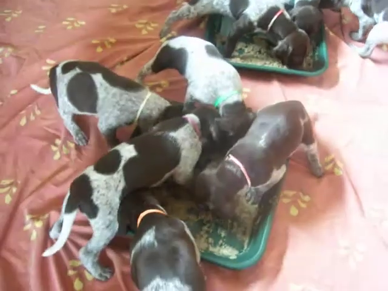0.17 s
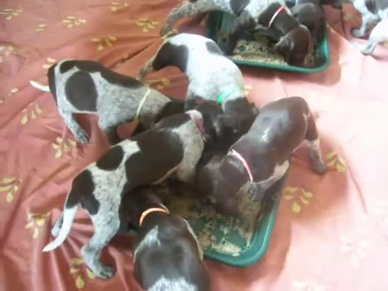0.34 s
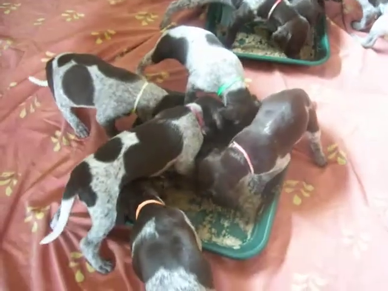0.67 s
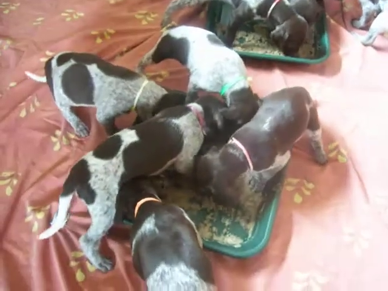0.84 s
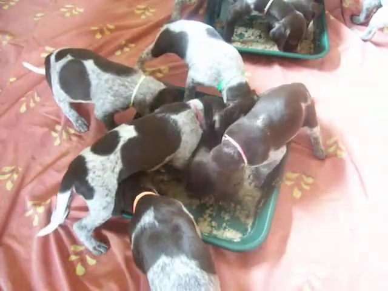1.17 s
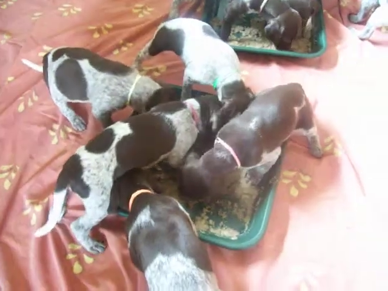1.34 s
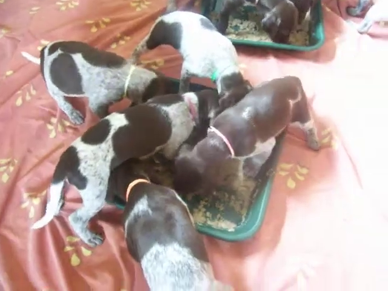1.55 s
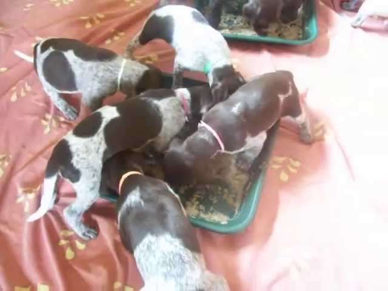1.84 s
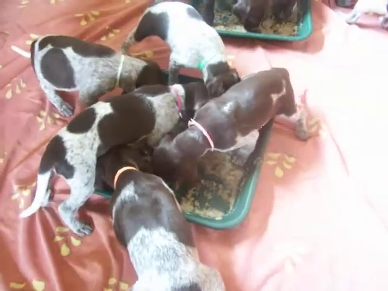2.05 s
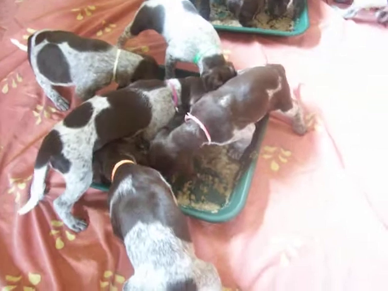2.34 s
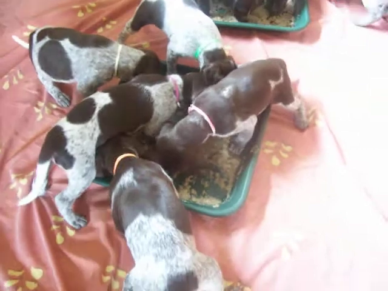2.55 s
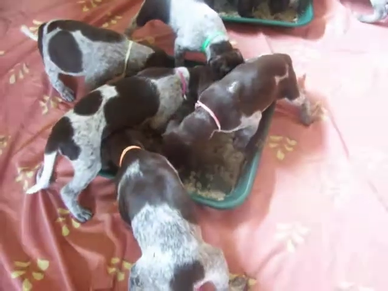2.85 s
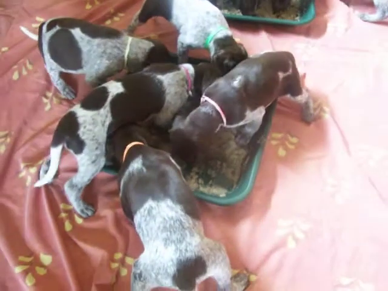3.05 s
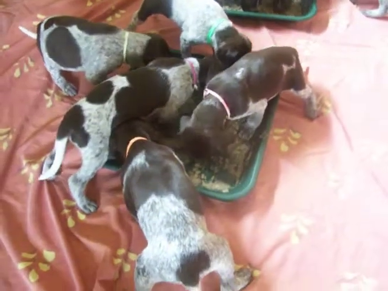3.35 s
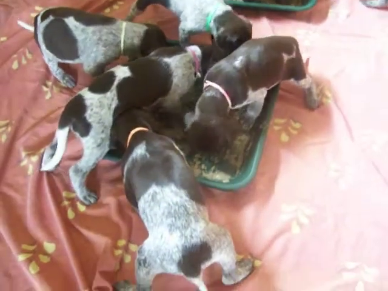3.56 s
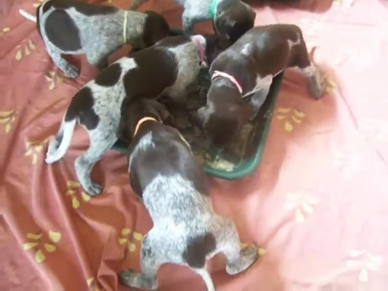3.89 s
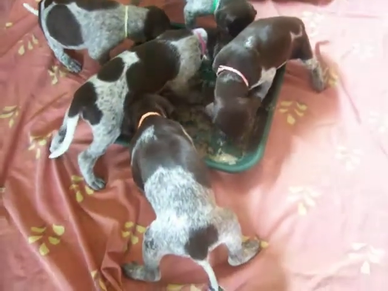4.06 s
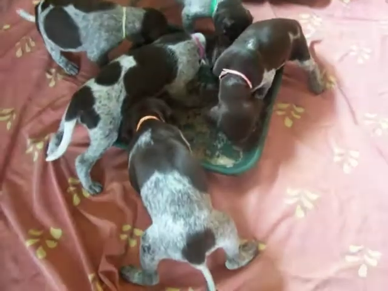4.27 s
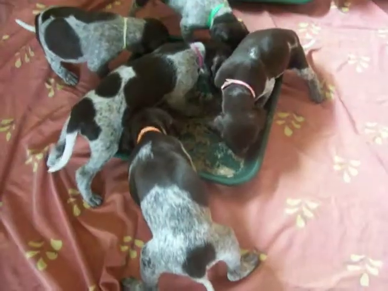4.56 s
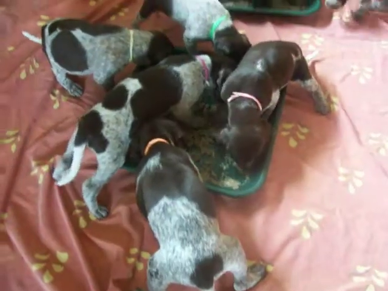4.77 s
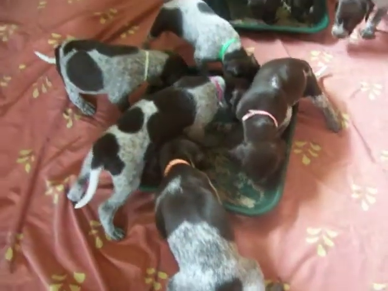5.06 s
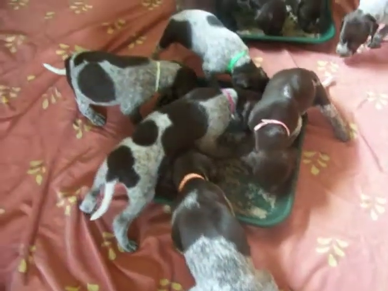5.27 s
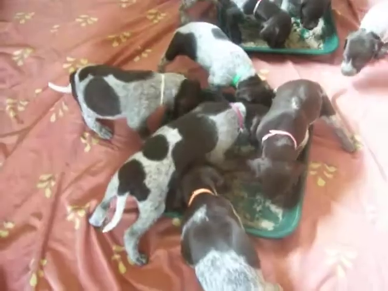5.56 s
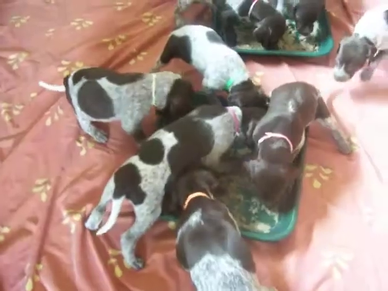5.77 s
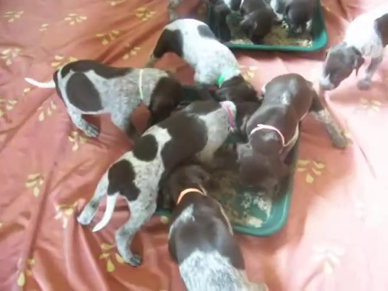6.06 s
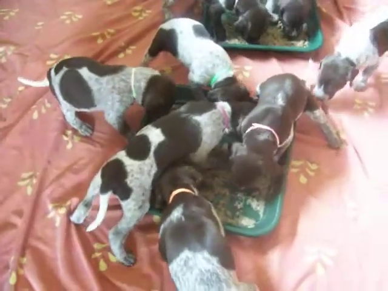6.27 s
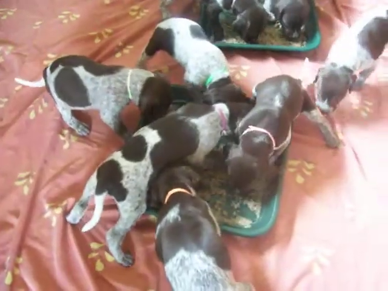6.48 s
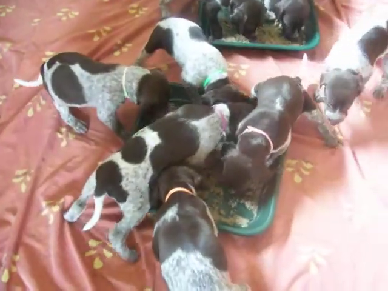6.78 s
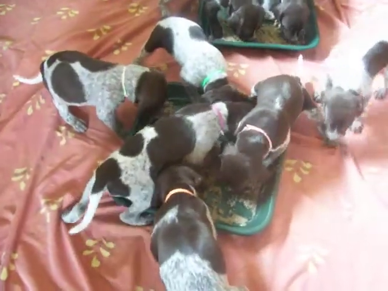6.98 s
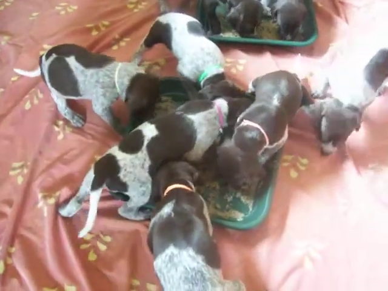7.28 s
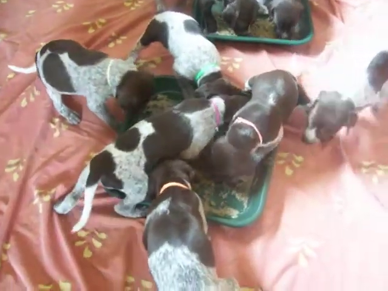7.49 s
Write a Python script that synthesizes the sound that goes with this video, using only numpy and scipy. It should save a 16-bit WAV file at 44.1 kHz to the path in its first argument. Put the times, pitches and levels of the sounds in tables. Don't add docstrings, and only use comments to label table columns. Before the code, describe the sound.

A litter of puppies eats wet food from shallow plastic trays in a small room. Irregular lip smacks, sharp tooth ticks and crackling slurps overlap continuously in short bouts, with hollow little glugs. Brief soft whimpers and gliding yelps appear mostly between two and five seconds. The mouths are close and fairly dry; the voices carry a short room echo. Faint hiss, low rumble and a distant motor lie beneath, through a modest camera microphone.

```python
import sys
import numpy as np
from scipy import signal
from scipy.fft import rfft, irfft
from scipy.io import wavfile
from scipy.ndimage import uniform_filter1d

SR = 44100
rng = np.random.default_rng(int(sys.argv[2]) if len(sys.argv) > 2 else 0)


def volts_from_db(level):
    exponent = np.asarray(level, float) / 20
    return 10 ** exponent


def transcribe(u):
    v = np.clip(np.atleast_2d(u).T, -1, 1)
    q = np.round(v * 32767).astype(np.int16)
    wavfile.write(sys.argv[1], SR, q)


N = 336924


def rms_one(x):
    return x / np.sqrt(np.mean(x ** 2) + 1e-20)


def in_time(rows):
    s, *columns = np.transpose(rows)
    times = np.arange(N) / SR
    return [np.interp(times, s, column) for column in columns]


def band(x, low_hz, high_hz, order=2):
    sos = signal.butter(order, [low_hz, high_hz], "band", fs=SR, output="sos")
    return signal.sosfilt(sos, x)


def drift(rate_hz):
    hop = 40
    r = np.exp(-2 * np.pi * rate_hz * hop / SR)
    noise = rng.standard_normal(N // hop + 2002)
    slow = signal.lfilter([1], [1, -2 * r, r * r], noise)[2000:]
    return np.interp(np.arange(N) / hop, np.arange(len(slow)), rms_one(slow))


def ring(clicks, hz, t60):
    r = volts_from_db(-60 / (t60 * SR))
    w = 2 * np.pi * hz / SR
    return signal.lfilter([0, np.sin(w)], [1, -2 * r * np.cos(w), r * r], clicks + 1e-18)


def smacks():
    rows = all_smacks()
    t = np.arange(2048) / SR
    out = np.zeros(N + len(t))
    wide = signal.butter(2, [1900, 7900], "band", fs=SR, output="sos")
    noises = rng.standard_normal((len(rows), len(t)))
    for (s, peak_db, hz, t60, breadth), noise in zip(rows, noises):
        spatter = 0.46 * noise * np.abs(np.roll(noise, 99)) * volts_from_db(-60 * t / max(t60, 0.002))
        spatter[0] = 1.51

        share = np.clip(breadth, 0.2, 1)
        reach = 1.25 + 1.8 * share ** 2
        crack = band(spatter, max(hz / reach, 1600), min(hz * reach, 9000), order=3)
        cavity = band(ring(crack, hz, 9 / hz), hz / 1.2, hz * 1.2, order=1)
        snap = signal.sosfilt(wide, spatter)
        pop = share * rms_one(crack) + (1 - share) * rms_one(cavity) + volts_from_db(-7) * rms_one(snap)

        at = round((s + 0.0007) * SR)
        out[at:at + len(t)] += volts_from_db(peak_db + 1.5) * pop / np.abs(pop).max()
    return out[:N]


def all_smacks():
    # t/s, peak level/dB, mouth cavity f/Hz, t60/s, crack breadth
    bodies = [
        (0.5025, -15, 4960, 0.0089, 0.7),
        (1.3726, -37, 2400, 0.0099, 0.1),
        (3.0381, -23.5, 3620, 0.015, 0.7),
        (3.6269, -18.5, 4500, 0.0021, 0.5),
        (5.3568, -28, 3450, 0.0073, 0),
        (6.7166, -15.5, 4270, 0.0056, 0.6),
    ]
    # t/s, peak level/dB, mouth cavity f/Hz, t60/s
    deep_smacks = [(0.389, -31, 2340, 0.048), (0.4329, -31.5, 3200, 0.012), (0.4666, -27.5, 2340, 0.029),
                   (0.7939, -28.5, 2910, 0.06), (1.7018, -37, 2110, 0.015), (1.7261, -52, 1810, 0.03),
                   (1.9605, -24.5, 3300, 0.023), (2.2913, -31.5, 2720, 0.021), (2.6978, -30, 2200, 0.0078),
                   (2.7308, -23, 3460, 0.036), (3.0379, -22, 3440, 0.016), (4.1285, -38, 1980, 0.0086),
                   (4.2065, -31, 2370, 0.013), (5.326, -37, 2080, 0.016), (5.3572, -21.5, 3050, 0.012),
                   (5.4804, -30, 2330, 0.061), (5.6423, -33.5, 2850, 0.013), (5.9504, -31, 2020, 0.018),
                   (5.9837, -36, 2030, 0.03), (6.181, -33, 2600, 0.02), (6.3974, -31, 2270, 0.031),
                   (6.766, -26.5, 2790, 0.014), (6.8115, -27, 3220, 0.017), (7.0928, -27, 2340, 0.0076)]
    # t/s, peak level/dB, mouth cavity f/Hz, t60/s
    lip_smacks = [(0.0472, -28, 3600, 0.019), (0.1437, -29.5, 4360, 0.008), (0.163, -26, 4180, 0.015),
                  (0.2526, -31.5, 5680, 0.011), (0.4098, -29, 4030, 0.015), (0.5592, -28.5, 4200, 0.014),
                  (0.9552, -32, 3500, 0.016), (1.3127, -23, 4500, 0.011), (1.6534, -32.5, 4130, 0.014),
                  (1.9126, -27, 4620, 0.0092), (2.0118, -30.5, 3460, 0.013), (2.0359, -33, 3500, 0.02),
                  (2.2627, -32, 5430, 0.012), (2.8734, -34.5, 3880, 0.025), (3.464, -34.5, 4130, 0.019),
                  (3.7815, -27, 4600, 0.013), (4.0655, -34, 3980, 0.015), (4.1487, -29, 4010, 0.0092),
                  (4.2767, -29.5, 3480, 0.011), (4.3031, -25, 4190, 0.014), (4.596, -25, 4530, 0.013),
                  (4.802, -28.5, 4300, 0.012), (4.9085, -32, 4250, 0.014), (4.956, -24.5, 3790, 0.014),
                  (6.6537, -26.5, 3850, 0.015), (7.2291, -22.5, 4430, 0.013), (7.3583, -31, 3500, 0.0074),
                  (7.417, -26.5, 4330, 0.019), (7.4726, -25, 4170, 0.0075), (7.6158, -30.5, 5550, 0.029),
                  (.470, -29, 4800, .03), (4.2065, -24, 5000, .015), (6.410, -30, 4000, .012),
                  (6.418, -30, 4400, .012), (6.531, -33, 3200, .02), (4.646, -29, 4000, .02),
                  (4.537, -31, 2800, .015), (4.345, -34, 3600, .012), (2.601, -34, 2600, .012),
                  (6.2265, -26, 4300, .015), (3.627, -27, 3700, .012), (4.235, -30, 6100, .02),
                  (4.428, -32, 6500, .015), (4.73, -34, 4300, .015), (2.795, -34, 2000, .02),
                  (3.297, -36, 2100, .02)]
    # t/s, peak level/dB, mouth cavity f/Hz, t60/s
    tooth_ticks = [(0.4873, -23.5, 6000, 0.012), (0.5038, -14.5, 7000, 0.0044), (0.6185, -31, 6600, 0.015),
                   (0.7846, -27, 7170, 0.025), (1.063, -32, 6170, 0.012), (1.0944, -29.5, 7400, 0.012),
                   (1.3553, -17.5, 7440, 0.0087), (1.493, -33, 6620, 0.015), (1.5574, -27, 7100, 0.023),
                   (1.6786, -28.5, 6570, 0.016), (2.393, -29, 6720, 0.011), (2.6005, -27.5, 7560, 0.023),
                   (2.6898, -29.5, 6150, 0.023), (3.241, -27.5, 7330, 0.017), (3.3233, -29, 6830, 0.018),
                   (3.5703, -29, 7600, 0.027), (3.6267, -17, 6480, 0.015), (3.8896, -26.5, 7000, 0.0082),
                   (4.4857, -28.5, 6720, 0.01), (4.8349, -26.5, 7400, 0.025), (5.0449, -21.5, 6030, 0.015),
                   (5.3911, -30.5, 6120, 0.025), (5.7733, -31.5, 5900, 0.0088),
                   (5.9274, -27.5, 6000, 0.014), (6.2262, -17.5, 6070, 0.0063), (6.3155, -31, 7000, 0.012),
                   (6.7161, -17.5, 6350, 0.008), (7.1636, -25, 7530, 0.014), (7.3093, -30, 6300, 0.015),
                   (7.453, -22, 7300, 0.015)]
    # t/s, peak level/dB, mouth cavity f/Hz
    small_spits = [(0.186, -30, 2880), (0.2114, -32, 3830), (0.2992, -28.5, 6220), (0.4668, -32, 2230),
                   (0.5153, -24, 4020), (0.5784, -25.5, 3800), (0.6526, -32, 4040), (0.7382, -31, 6100),
                   (0.7692, -30, 5400), (0.8562, -31, 3810), (0.9758, -31.5, 3670), (1.082, -29.5, 6970),
                   (1.271, -29, 3380), (1.286, -30.5, 3430), (1.3247, -28.5, 4450), (1.3376, -22, 6750),
                   (1.7341, -31, 1780), (2.0564, -23.5, 7300), (2.335, -29, 5760), (2.437, -30, 2220),
                   (2.7172, -25.5, 3330), (2.8798, -22.5, 5560), (2.9444, -29.5, 4340), (3.1165, -33, 2850),
                   (3.188, -34.5, 1970), (3.2061, -27.5, 5770), (3.3423, -23.5, 6530),
                   (3.9599, -30.5, 5840), (4.0972, -34, 6200), (4.376, -29.5, 3620), (4.4088, -29.5, 6370),
                   (4.5354, -28.5, 6480), (4.6207, -33, 1520), (4.9337, -23.5, 7470), (4.9861, -30, 1940),
                   (5.314, -38.5, 1770), (5.6264, -34, 2840), (5.7323, -31.5, 1900), (6.136, -39, 3000),
                   (6.1505, -28.5, 4120), (6.2564, -27.5, 1960), (6.3212, -26, 6230), (6.384, -29.5, 4580),
                   (6.3994, -30, 2280), (6.4174, -33, 2250), (6.4632, -34, 1920), (6.5122, -36, 1960),
                   (6.531, -37, 1560), (6.625, -33, 4400), (6.785, -29.5, 4700), (6.8374, -30.5, 7000),
                   (6.938, -35, 6120), (6.9865, -31, 3960), (7.006, -31, 5660), (7.0107, -27, 5510),
                   (7.0519, -31, 2030), (7.1356, -31, 2070), (7.2155, -29, 4270), (7.519, -26, 3870)]

    rows = list(bodies)
    for kind, breadth in [(deep_smacks, 0.45), (lip_smacks, 0.35), (tooth_ticks, 0.2)]:
        for s, peak_db, hz, t60 in kind:
            rows.append((s, peak_db, hz, t60, breadth + 0.004 * (peak_db + 28)))
    spit_t60_s, spit_breadth, spit_trim_db = 0.012, 0.36, -5.5
    for s, peak_db, hz in small_spits:
        rows.append((s, peak_db + spit_trim_db, hz, spit_t60_s, spit_breadth))
    return rows


def slurping():
    crackle_db, slosh_db = bouts()
    crackle = bubbles(per_s=1100, low_hz=3400, high_hz=8200, cycles=16, spread_db=4.3, smooth=0.65)
    slosh = bubbles(per_s=350, low_hz=1000, high_hz=3200, cycles=12, spread_db=3.5, smooth=0.9)
    return volts_from_db(crackle_db - 2.5) * crackle + volts_from_db(slosh_db - 8) * slosh


def bouts():
    # t/s, drain/s, crackle level/dB, slosh level/dB
    laps = [(0.0, 0.95, -43.5, -45.5), (0.4, 0.08, -37.5, -45), (.505, 0.11, -35.5, -57),
            (.967, 0.078, -39.5, -59.5), (1.101, 0.068, -43.5, -42), (1.667, 0.24, -54, -54),
            (2.299, 0.1, -41.5, -45), (2.625, 0.53, -40, -43), (3.048, .17, -39.5, -45.5),
            (3.639, 0.28, -44.5, -64), (3.907, 0.035, -43, -39), (4.21, 0.19, -36, -41.5),
            (4.85, 0.28, -44, -40.5), (5.059, 0.25, -37.5, -41.5), (5.356, 0.16, -62.5, -71),
            (5.484, .09, -40.5, -41), (5.653, .12, -46, -39), (6.19, 0.13, -45.5, -42),
            (6.401, 0.075, -42, -42), (6.777, 0.057, -37.5, -40), (7.1, 0.11, -41.5, -43.5)]
    # peak t/s, swell/s, crackle level/dB, slosh level/dB
    sucks = [(0.771, 0.16, -41.5, -41.5), (1.335, 0.085, -33.5, -42.5), (1.575, 0.13, -52, -68),
             (1.733, 0.12, -38, -37), (2.039, 0.081, -36.5, -43), (2.4, 0.048, -42, -43),
             (2.898, 0.07, -45, -59), (3.22, 0.22, -53, -46.5), (3.34, 0.12, -40.5, -58),
             (4.134, 0.061, -41, -39), (4.539, 0.21, -38, -37.5), (4.671, 0.063, -40, -37),
             (5.313, 0.082, -56.5, -53), (5.781, 0.017, -36, -39.5), (5.995, 0.04, -39.5, -59),
             (6.255, 0.05, -40.5, -33), (6.34, 0.087, -44.5, -40.5), (1.225, .05, -49, -37),
             (6.5, 0.059, -48, -44.5), (6.699, 0.071, -55.5, -51), (7.004, 0.054, -42.5, -41),
             (7.463, 0.27, -41, -43)]
    lap_attack_s, range_db = 0.02, 13.5
    chewing_db = np.array([[-54.5], [-71.5]])

    rows = [(lap_attack_s, *lap) for lap in laps]
    rows += [(suck[1], *suck) for suck in sucks]
    t = np.arange(0, N + 64, 64) / SR
    power = volts_from_db(2 * chewing_db)
    for rise_s, s, fall_s, *peaks_db in rows:
        away = np.maximum((s - t) / rise_s, (t - s) / fall_s)
        power = power + volts_from_db(2 * (np.array(peaks_db)[:, None] - range_db * away))
    return [10 * np.log10(np.interp(np.arange(N) / SR, t, p)) for p in power]


def bubbles(per_s, low_hz, high_hz, cycles, spread_db, smooth):
    sizes = volts_from_db(spread_db * np.minimum(rng.exponential(1, N), 3.6)) * rng.choice([-1, 1], N)
    born = rng.random(N) < per_s * volts_from_db(5 * drift(25)) / SR
    pitches = np.geomspace(low_hz, high_hz, 14)
    dealt = rng.integers(0, len(pitches), N)
    rings = sum(ring(sizes * born * (dealt == k), hz, cycles / hz) for k, hz in enumerate(pitches))
    air = band(rng.standard_normal(N), low_hz, high_hz) * volts_from_db(3.4 * drift(14))
    return rms_one(rms_one(band(rings, low_hz, high_hz, order=1)) + smooth * rms_one(air))


def glugs():
    # t/s, peak level/dB, resonance f/Hz, t60/s
    hollow_glugs = [(.19, -46.5, 640, 0.43), (.23, -48, 407, 0.33), (.695, -43.5, 740, 0.064),
                    (1.284, -38, 2050, 0.5), (1.415, -42, 800, 0.061), (3.92, -44, 150, 0.08),
                    (2.78, -35, 707, 0.055), (3.715, -43, 2060, 0.033), (3.744, -42.5, 1350, 0.03),
                    (3.78, -37, 1840, 0.037), (3.84, -41, 2130, 0.47), (4.206, -30.5, 2250, 0.18),
                    (4.208, -38, 1460, 0.25), (4.243, -43.5, 610, .2), (4.288, -34, 2100, 0.046),
                    (4.66, -42, 720, 0.054), (5.052, -31, 3200, 0.14), (5.482, -38, 2200, 0.39),
                    (5.48, -38.5, 890, 0.026), (5.57, -45.5, 770, 0.16), (5.985, -34.5, 2010, 0.04),
                    (6.116, -43.5, 500, 0.018), (6.18, -36, 1150, 0.065), (6.179, -40.5, 873, 0.09),
                    (6.228, -43, 1070, 0.043), (6.315, -43.5, 1200, 0.053), (6.428, -43, 1040, 0.051),
                    (6.525, -39, 1710, 0.07), (1.728, -35.5, 1860, 0.064), (1.835, -47, 800, 0.25),
                    (1.59, -43.5, 2010, .08), (2.785, -39.5, 1510, 0.056), (6.462, -38.5, 1860, 0.2),
                    (6.245, -32.5, 2130, 0.052), (6.395, -31, 2190, 0.092), (6.459, -45, 1000, 0.08),
                    (6.718, -35, 1190, 0.3), (4.6, -40, 1500, .5), (3.395, -44, 1700, .25),
                    (2.415, -44, 1030, .25), (1.19, -44, 1500, .1), (6.96, -51, 249, 0.14),
                    (6.97, -44, 553, 0.097), (7.095, -36, 2190, 0.037), (7.415, -36, 1880, 0.051)]
    # t/s, peak level/dB, cavity f/Hz, t60/s
    wet_wheezes = [
        (4.501, -30, 6730, 0.49),
        (5.059, -28, 6570, 0.12),
        (6.121, -31, 7200, 0.022),
        (6.232, -29.5, 6340, 0.26),
    ]

    rows = list(hollow_glugs) + list(wet_wheezes)
    t = np.arange(8192) / SR
    out = np.zeros(N + len(t))
    noises = rng.standard_normal((len(rows), 2, len(t)))
    for (s, peak_db, hz, t60), (noise, lumps) in zip(rows, noises):
        puff = noise * (1 - np.exp(-t / 0.0012)) * volts_from_db(-60 * t / t60)
        puff = puff * volts_from_db(2.3 * rms_one(uniform_filter1d(lumps, size=150)))
        glug = band(puff, hz / 1.08, hz * 1.08)
        at = round(s * SR)
        out[at:at + len(t)] += volts_from_db(peak_db) * glug / np.abs(glug).max()
    return out[:N]


def whimpers():
    # hoarseness (0-1), fall per overtone/dB
    throats = [(.2, -12), (.25, -16), (.4, -14), (.4, -14), (.35, -14), (.3, -7), (.3, -14), (.5, -6),
               (.9, -7), (.3, -12), (.4, -12), (.2, -12)]
    out = np.zeros(N)
    shake, waver = drift(130), drift(76)
    for rows, (hoarse, fall_db) in zip(all_calls(), throats):
        s, *columns = np.transpose(rows)
        at = np.arange(round(s[0] * SR), round(s[-1] * SR))
        hz, level_db, open_db = [np.interp(at / SR, s, column) for column in columns]
        phase = 2 * np.pi * np.cumsum(hz * (1 + 0.06 * hoarse * waver[at])) / SR
        voice = np.sin(phase)
        for k in range(3):
            voice = voice + volts_from_db(open_db + fall_db * k) * np.sin((k + 2) * phase)
        edges = np.clip(np.minimum(at - at[0], at[-1] - at) / (0.0056 * SR), 0, 1)
        out[at] += np.sqrt(2) * volts_from_db(level_db - 2.5) * edges * voice * (1 + hoarse * shake[at])
    return out


def all_calls():
    # t/s, pitch f/Hz, fundamental level/dB, mouth opening level/dB
    yelps = [
        [(2.154, 784, -49, -20), (2.172, 516, -39, -10), (2.194, 490, -57, 1)],
        [(2.338, 690, -37, -20), (2.35, 509, -41.5, -7), (2.38, 525, -35, -3.5), (2.392, 455, -34, -13),
         (2.402, 428, -51, -5)],
        [(2.575, 579, -40.5, -7), (2.603, 596, -39, -3.5), (2.618, 706, -29.5, -6.5), (2.632, 800, -31.5, -12),
         (2.648, 850, -56, -9)],
        [(3.218, 697, -45, -8), (3.23, 517, -42, -12), (3.245, 552, -39.5, -2), (3.265, 744, -26.5, -13),
         (3.29, 845, -47, -20), (3.3, 850, -59, -11)],
        [(3.322, 1235, -37, -22), (3.342, 1002, -39, -35), (3.372, 832, -37.5, -13), (3.393, 840, -36, -15)],
    ]
    # t/s, length/s, peak level/dB, peak pitch f/Hz, sag share
    short_whimpers = [
        (1.18, 0.045, -40, 409.6, 0.12),
        (2.682, 0.032, -28.5, 745, 0.25),
        (4.204, 0.017, -33.5, 666, -0.2),
        (4.46, 0.25, -51, 789.6, .08),
        (4.879, 0.024, -40.5, 908, 0.18),
        (5.043, 0.038, -40, 749, 0.096),
        (7.53, 0.035, -35, 530, 0.14),
    ]
    mouths_db = [-1, -10.5, -33, 3.5, -26, -17, -28]
    peak_share, onset_db, end_db = 0.27, -7, -6

    calls = list(yelps)
    for (s, length, db, hz, sag), mouth in zip(short_whimpers, mouths_db):
        onset = (s, hz * (1 + sag * peak_share), db + onset_db, mouth)
        peak = (s + peak_share * length, hz, db, mouth)
        end = (s + length, hz * (1 - sag * (1 - peak_share)), db + end_db, mouth)
        calls.append([onset, peak, end])
    return calls


def tray(x):
    # delay t/s, level/dB
    tray_echoes = [
        (.0022, -14),
        (.0045, -10),
    ]
    return x + sum(volts_from_db(db) * np.pad(x, (round(s * SR), 0))[:N] for s, db in tray_echoes)


def room(x):
    t60_s, gap_s, wall_cut_hz = 0.27, 0.009, 8500
    t = np.arange(SR // 2) / SR
    walls = rng.standard_normal(len(t)) * volts_from_db(-60 * t / t60_s) * np.clip(t / gap_s - 0.5, 0, 1)
    modes = rfft(walls)
    walls = irfft(modes / np.sqrt(uniform_filter1d(np.abs(modes) ** 2, size=50)), len(t))
    walls = signal.sosfilt(signal.butter(1, wall_cut_hz, fs=SR, output="sos"), walls)
    return signal.fftconvolve(x, walls / np.sqrt(np.sum(walls ** 2)))[:N]


def background():
    # f/Hz, level/dB per Hz
    floor_spectrum = [(60, -1.5), (120, 11), (250, 9), (500, 9), (1000, 4.5), (2000, 6), (4000, -2),
                      (7000, 4.5)]
    # t/s, level/dB
    rumble_levels = [
        (0.0, -52),
        (0.74, -50.5),
        (5.72, -53),
        (7.21, -50.5),
        (7.4, -45),
        (7.64, -47),
    ]
    # t/s, f/Hz, level/dB
    motor_line = [(0.0, 83.83, -62.5), (0.68, 89.85, -68), (1.47, 84.4, -67.5), (1.57, 90.06, -67),
                  (3.83, 90.6, -56), (4.23, 85.3, -62), (4.32, 89.93, -64), (4.85, 89.3, -61.5),
                  (5.8, 88, -63.5), (6.5, 87.56, -52.5), (7.64, 85.9, -44.5)]
    floor_db, mains_hz, mains_db = -48, 121.1, -67

    white = rng.standard_normal((3, N + SR))
    hz, db = np.transpose(floor_spectrum)
    edges = 48 * 2 ** np.arange(0, 8.1, 0.5)
    tone = 0
    for k, (low, high) in enumerate(zip(edges, edges[1:])):
        level_db = np.interp(np.log(low * high) / 2, np.log(hz), db)
        tone = tone + volts_from_db(level_db + 1.8 * drift(15)) * band(white[k % 2], low, high)[SR:]

    beat = np.sqrt(2) * np.sin(2 * np.pi * np.cumsum(30 + 2 * drift(3)) / SR)
    deep = rms_one(band(white[2], 19, 62)[SR:])
    rumble = volts_from_db(in_time(rumble_levels)[0]) * rms_one(beat + 1.1 * deep)

    motor_hz, motor_db = in_time(motor_line)
    motor_phase = 2 * np.pi * np.cumsum(motor_hz + 3 * drift(6)) / SR
    motor = volts_from_db(motor_db + 1.8 * drift(6)) * np.sin(motor_phase)
    hum = volts_from_db(mains_db + 2.2 * drift(2.3)) * np.sin(2 * np.pi * mains_hz * np.arange(N) / SR)
    return volts_from_db(floor_db) * rms_one(tone) + rumble + np.sqrt(2) * (motor + hum)


def scene():
    pops, hollow, wet, voices = tray(smacks()), glugs(), slurping(), whimpers()
    close = volts_from_db(-13.5) * pops + volts_from_db(-8) * hollow
    echo = room(close + volts_from_db(-21) * wet + volts_from_db(-7) * voices)
    return (pops + hollow + wet + voices + echo + background())[None]


def top_cut(x):
    return signal.sosfilt(signal.butter(12, 9070, fs=SR, output="sos"), x)


def record(dry):
    sampling_hz, notch_hz = 16000, 7865
    x = signal.lfilter(*signal.iirnotch(notch_hz, 70, SR), dry)
    spectrum = rfft(x)
    below_half = np.arange(spectrum.shape[-1]) * SR / N < sampling_hz / 2
    x = irfft(spectrum * below_half, N)
    mirrored = x * (1 + 2 * np.cos(2 * np.pi * sampling_hz * np.arange(N) / SR))
    taps = signal.firwin(77, 7950, window="blackman", fs=SR)
    return top_cut(signal.fftconvolve(mirrored, taps[None], "same"))


dry = scene()
out = record(dry)
transcribe(out)
```